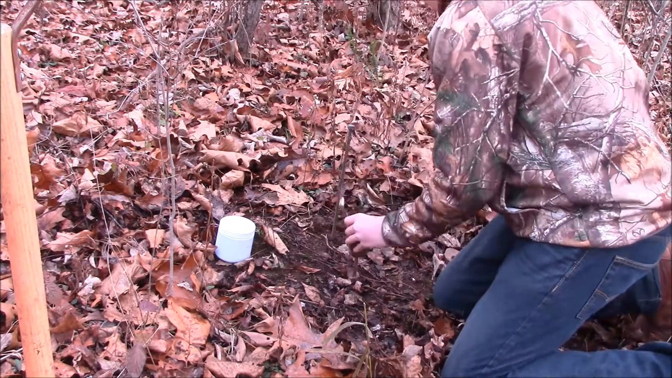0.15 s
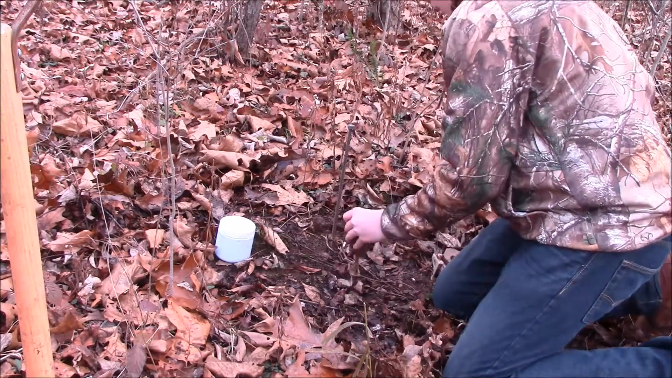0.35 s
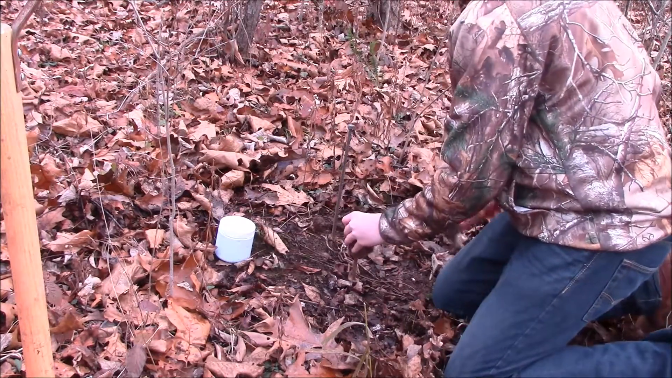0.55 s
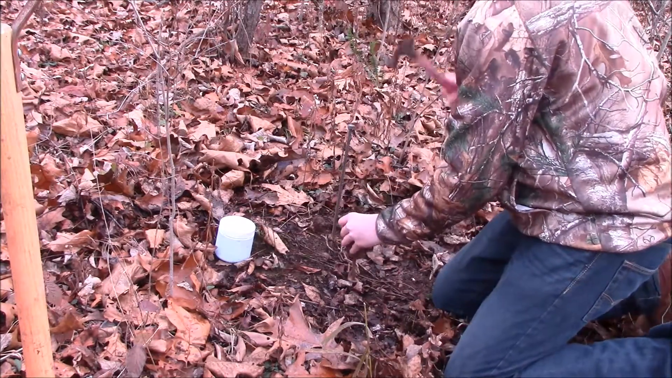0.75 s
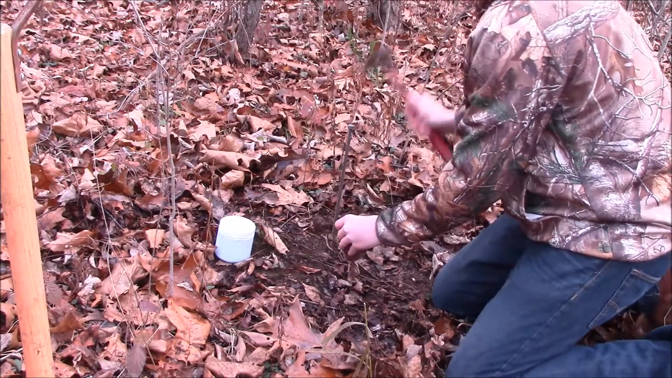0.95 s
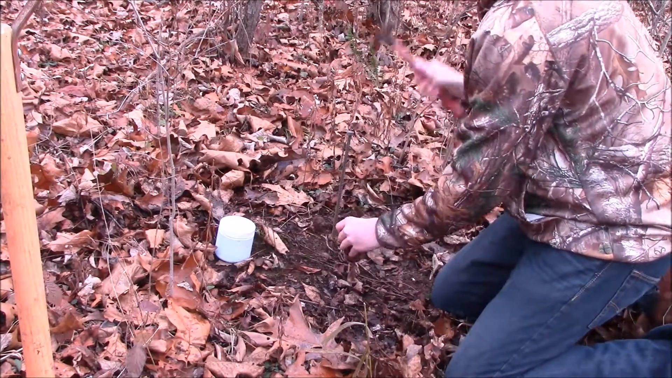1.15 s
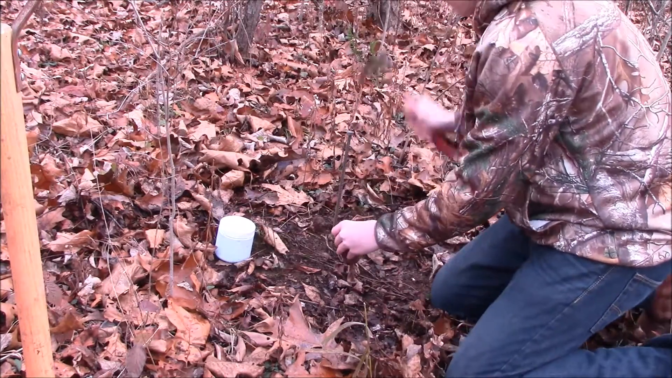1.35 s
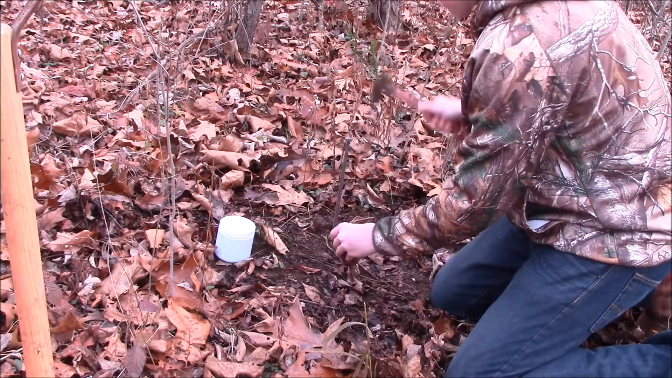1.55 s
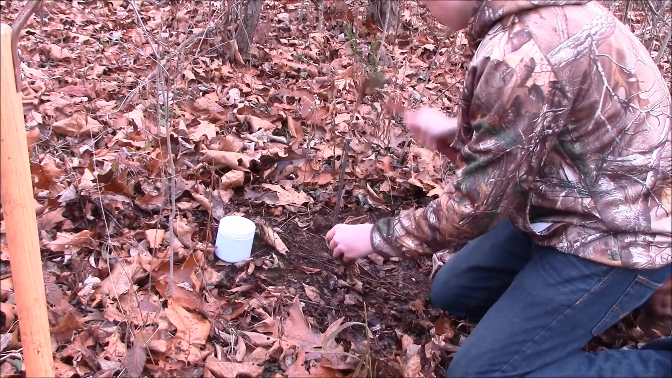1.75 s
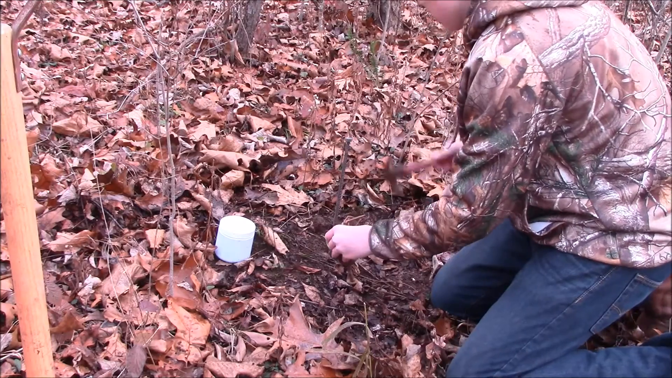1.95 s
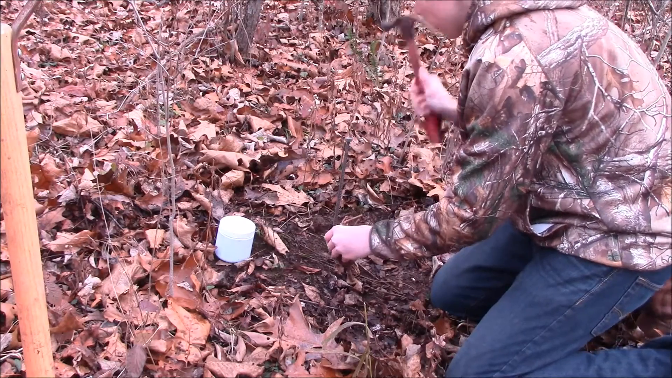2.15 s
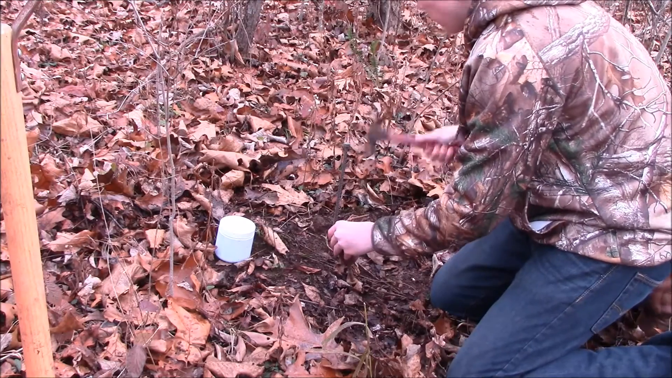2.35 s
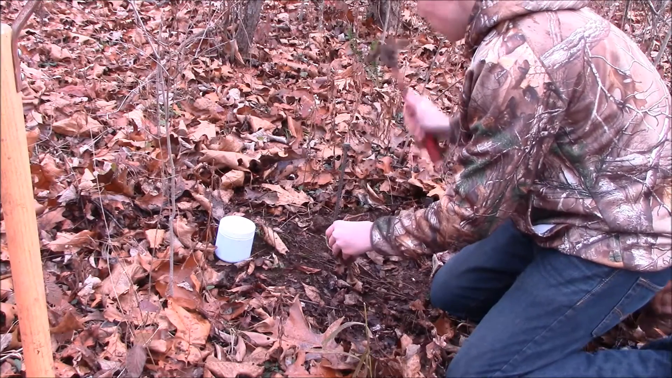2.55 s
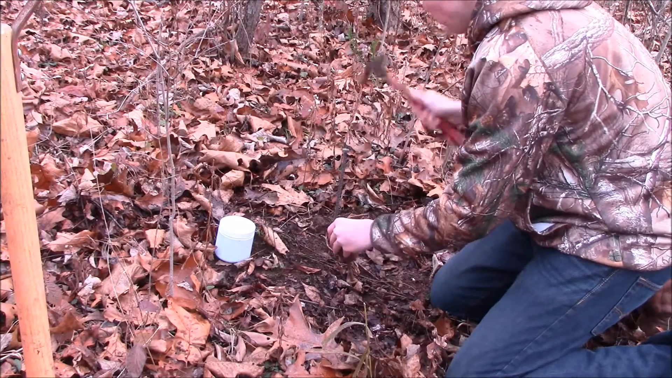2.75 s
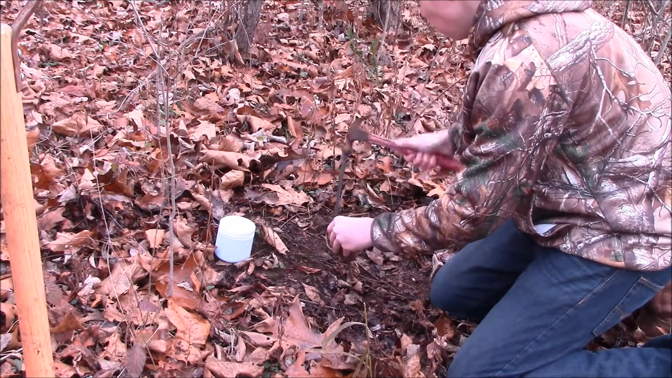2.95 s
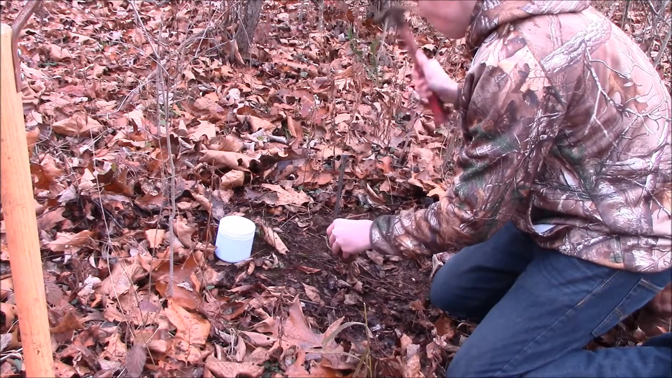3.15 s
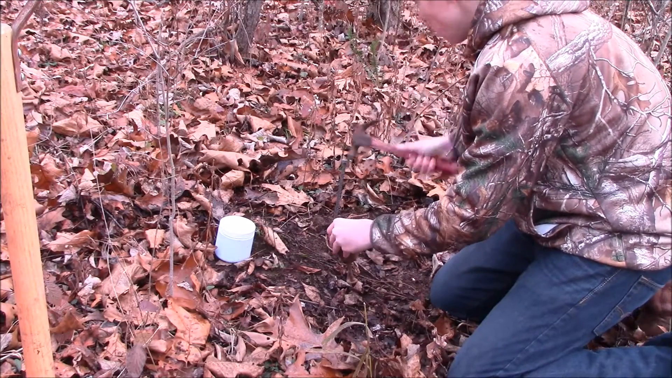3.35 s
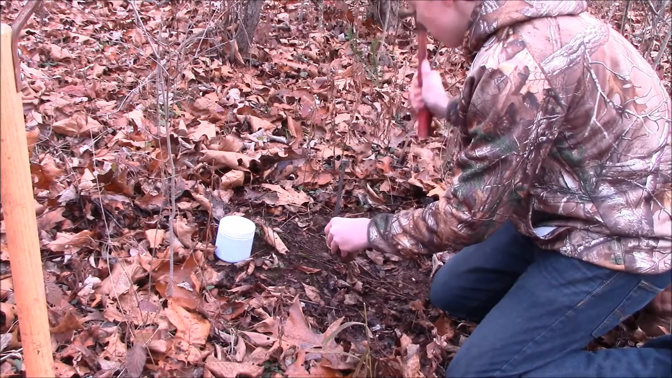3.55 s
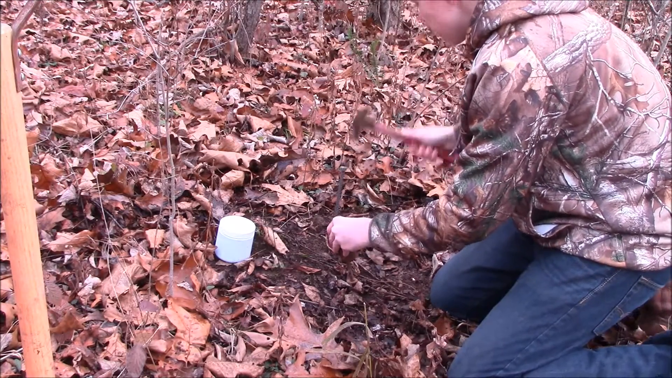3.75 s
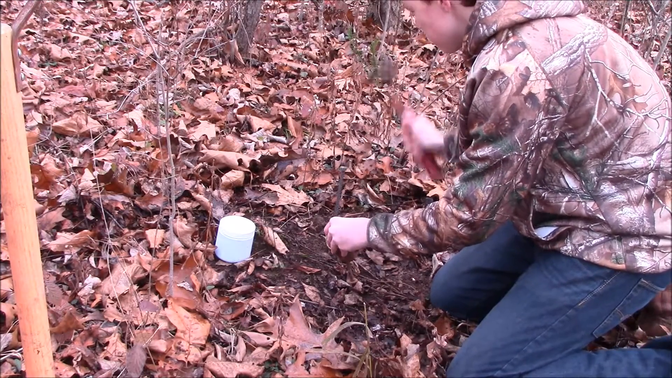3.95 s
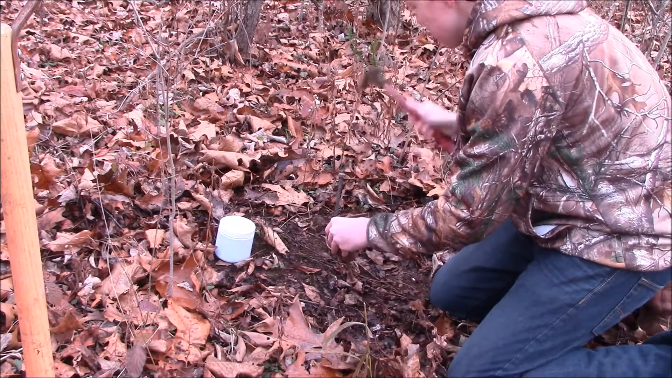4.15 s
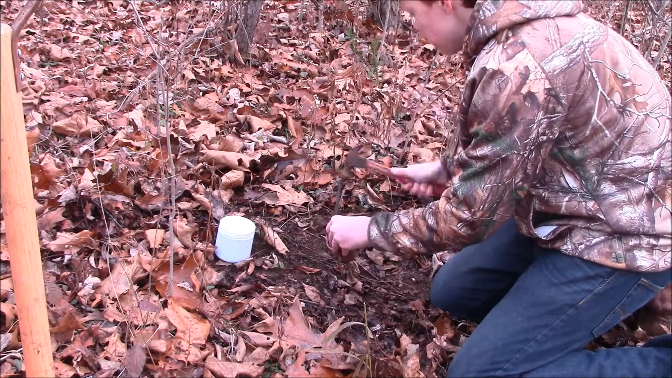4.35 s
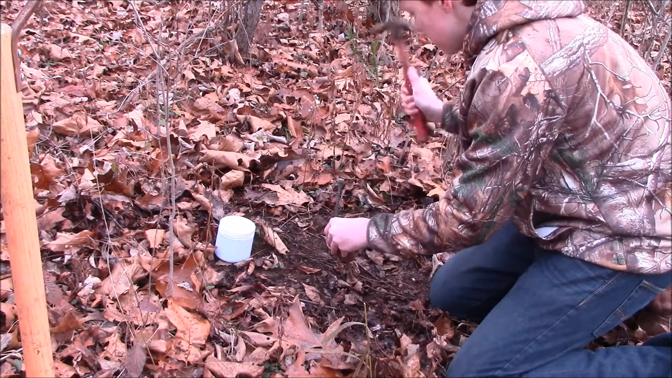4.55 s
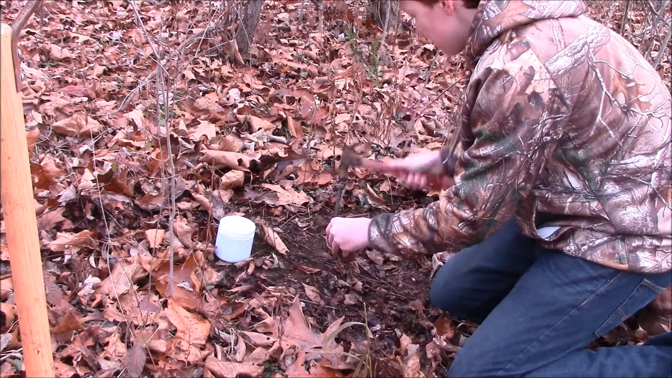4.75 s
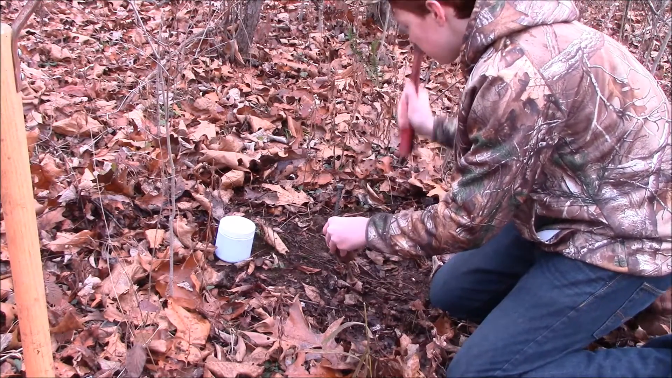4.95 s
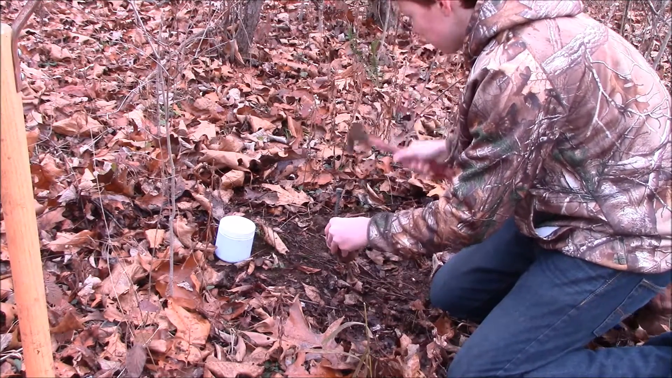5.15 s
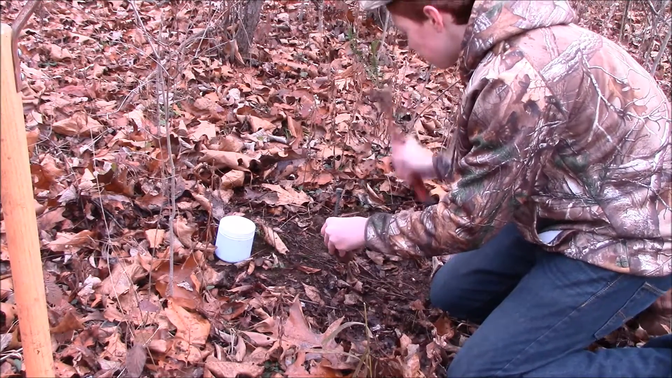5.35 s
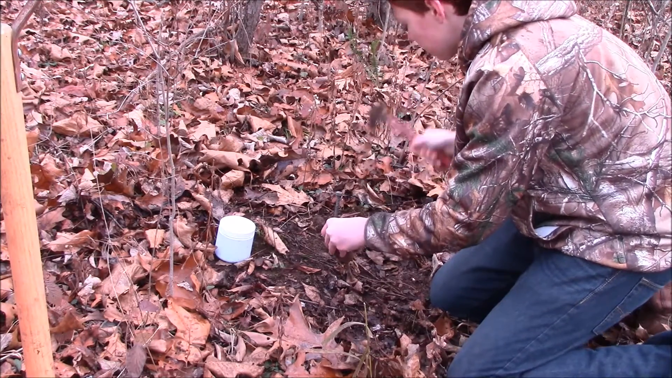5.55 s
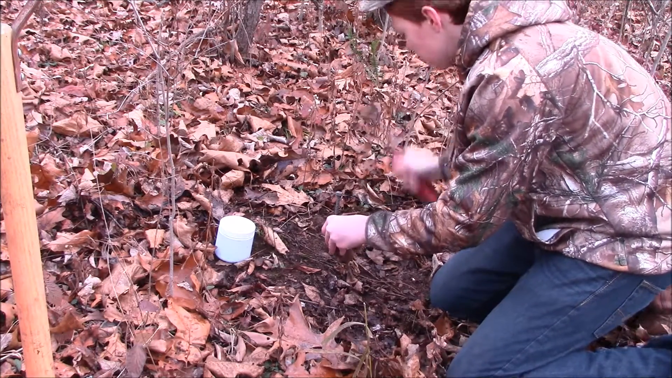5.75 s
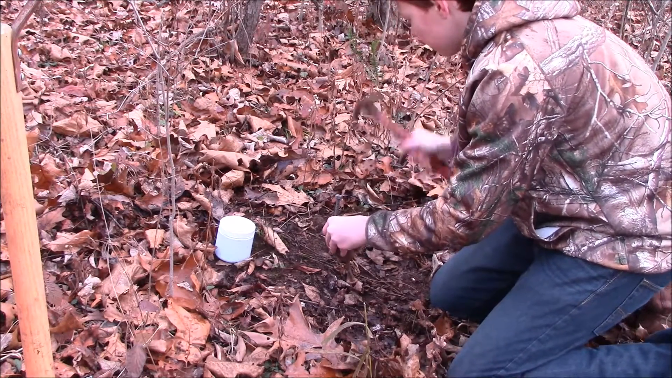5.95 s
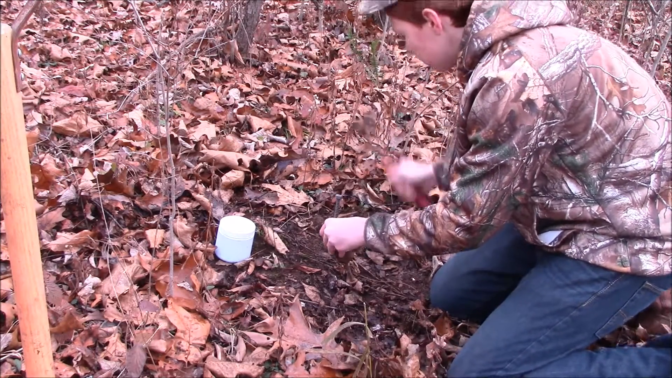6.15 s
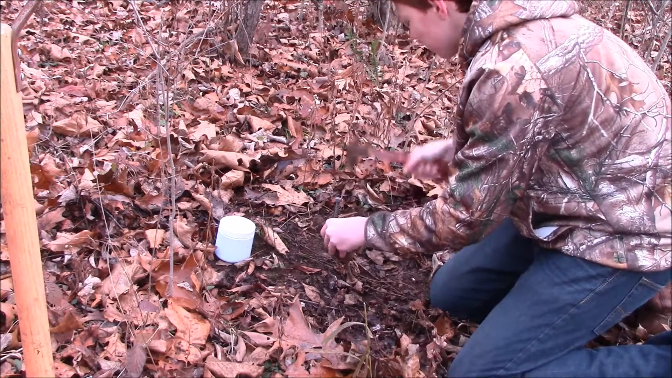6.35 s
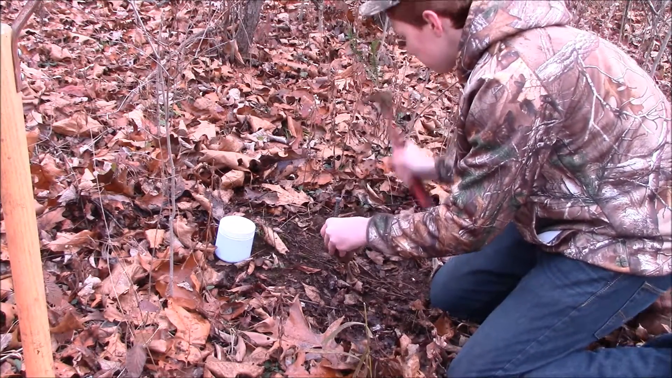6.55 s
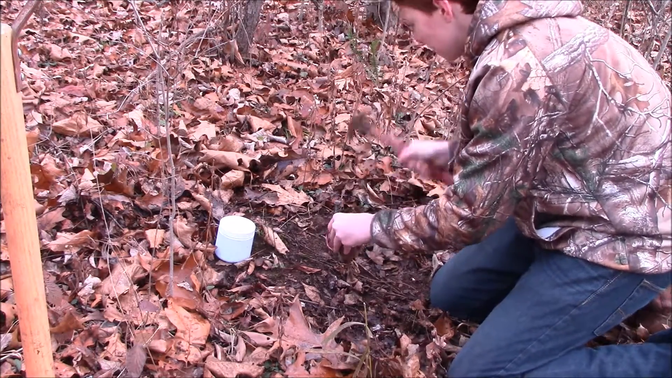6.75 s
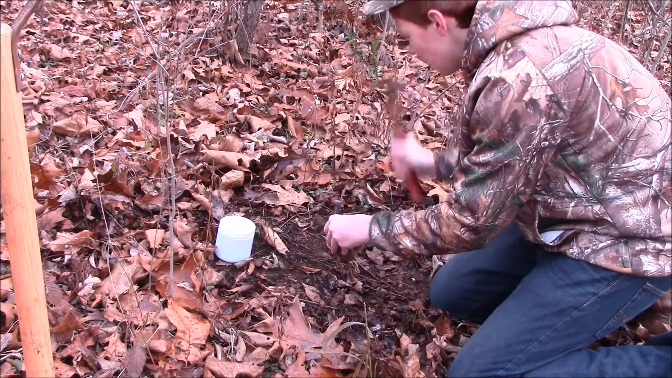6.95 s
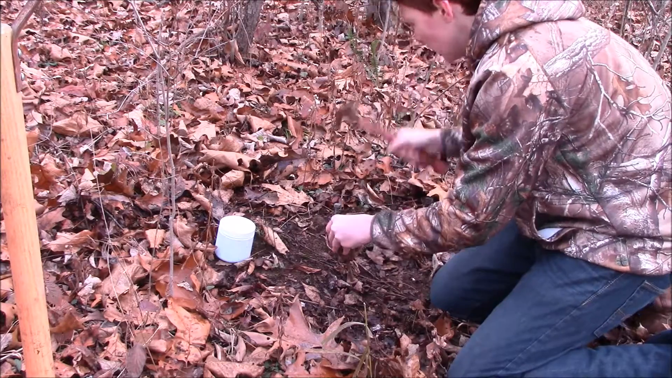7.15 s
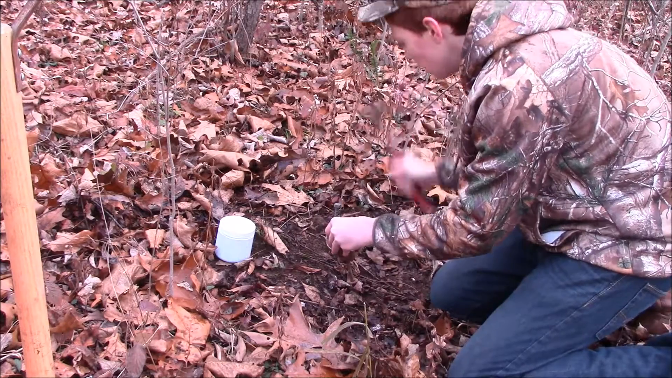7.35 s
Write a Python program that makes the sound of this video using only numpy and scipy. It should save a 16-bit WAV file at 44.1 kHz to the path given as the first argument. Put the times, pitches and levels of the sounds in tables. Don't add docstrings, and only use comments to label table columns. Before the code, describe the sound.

Sixteen hard metallic hammer blows drive a steel stake into soft ground, over distant traffic hum, with short echoes off trees and light sleeve rustle.

```python
import sys
import numpy as np
from scipy import signal
from scipy.fft import rfft, irfft
from scipy.io import wavfile

SR = 44100
rng = np.random.default_rng(int(sys.argv[2]) if len(sys.argv) > 2 else 0)


def ratio_of_db(decibels):
    return 10 ** (np.asarray(decibels, float) / 20)


def materialize(psi):
    bounded = np.clip(np.atleast_2d(psi).T, -1, 1)
    quanta = np.round(bounded * 32767).astype(np.int16)
    wavfile.write(sys.argv[1], SR, quanta)


N = 326340
T = np.arange(N) / SR

# (first contact [s], force [dB], hardness [dB], angle of the landing spot on the face [deg],
# contact duration [s])
BLOWS = [(1.0405, -19, 0, 159, 0.0046), (1.4346, -19, 3, 50, 0.0036), (2.2897, -20, -1.5, 131, 0.006),
         (2.6569, -19, 2.9, 76, .003), (3.0074, -18.5, 3.5, 162, .003), (3.3564, -19, 2, 76, 0.0033),
         (3.7048, -18.5, 4, 121, .004), (4.053, -18, 4, 103, 0.0027), (4.4007, -18.5, 1.7, 180, .003),
         (4.7424, -16, -1.65, 72, .0028), (5.0974, -18, -2.5, 175, 0.0027), (5.4540, -19.5, -5, 54, 0.004),
         (5.8470, -23, 2.5, 163, 0.0045), (6.2425, -19.5, -10, 52, .0033), (6.6608, -24, 3.8, 99, 0.0024),
         (7.0655, -23, -4.5, 75, 0.0052)]


def fade(t, t60):
    return np.exp(-np.log(1000) * t / t60)


def unit(x):
    return x / np.sqrt(np.mean(x ** 2))


def add(out, s, x):
    i = int(s * SR)
    out[i:i + len(x)] += x[:len(out) - i]


def colour(x, points):
    hz, db = np.transpose(points)
    f = np.arange(x.shape[-1] // 2 + 1) * SR / x.shape[-1]
    gain = ratio_of_db(np.interp(np.log(f + 1), np.log(hz), db))
    return irfft(rfft(x) * gain, x.shape[-1])


def band(x, hz, octaves):
    edges = np.clip(hz * 2 ** (np.array([-.5, .5]) * octaves), 20, .45 * SR)
    return signal.sosfilt(signal.butter(2, edges, "band", fs=SR, output="sos"), x)


def walk(rate):
    return unit(np.interp(T * rate, np.arange(200), rng.standard_normal(200)))


def wide(side_db, size=N):
    mid, side = rng.standard_normal((2, size))
    return mid + ratio_of_db(side_db) * side * np.array([[1], [-1]])


def tones(hz, t60, db, t):
    phase, tune = rng.standard_normal((2, len(hz), 1))
    sines = np.sin(2 * np.pi * hz * (1 + 0.0011 * tune) * t + phase)
    return np.sum(ratio_of_db(db) * fade(t, t60) * sines, axis=0)


def pings(table):
    out, t = np.zeros(N), T[:8192]
    for s, db, hz, t60, *caught in table:
        caught_s = caught[0] if caught else 1
        onset_and_catch = np.clip(np.minimum(t / 0.00051, (caught_s - t) / .004), 0, 1)
        add(out, s, ratio_of_db(db) * fade(t, t60) * np.sin(2 * np.pi * hz * t) * onset_and_catch)
    return out


def gain_db(s):
    # (time [s], gain [dB])
    gain = [(0, 2), (.8, -.3), (3.8, 0.3), (4.75, -2), (5.5, -7.5), (6.1, -9), (6.8, -12.5), (7.4, -13)]
    return np.interp(s, *np.transpose(gain))


def woods():
    # (frequency [Hz], density [dB per Hz])
    hum_spectrum = [(15, -75.5), (25, -19), (43, -25), (92, -4.5), (135, -3.5), (162, 1), (204, -1),
                    (225, -3), (257, 2.5), (524, -7), (569, -5), (1300, -17.5), (1690, -45.5), (2860, -120)]
    # (frequency [Hz], density [dB per Hz])
    air_spectrum = [(530, -25), (900, -10), (1470, -4.5), (2220, -7), (3300, -7), (4680, -12),
                    (6250, -12.5), (14200, -27), (16000, -41.5)]
    hum_db, air_db = -59.5, -64.5
    low = colour(wide(-20), hum_spectrum)
    hum = ratio_of_db(0.96 * walk(7.2)) * band(low, 110, 2.8)
    hum = hum + ratio_of_db(1.2 * walk(1.3)) * band(low, 600, 2.49)
    air = unit(colour(wide(-14.0), [(450, air_spectrum[0][1] - 30)] + air_spectrum))
    swell_s, swell_width_s, swell_db = 1.58, 0.19, 4.5
    swell = swell_db * np.exp(-((T - swell_s) / swell_width_s) ** 2)
    return ratio_of_db(gain_db(T)) * (ratio_of_db(hum_db + swell) * unit(hum) + ratio_of_db(air_db) * air)


def chain():
    # (frequency [Hz], level [dB], T60 [s])
    big_link = [(3080, -23, .14), (5110, -28.5, 0.16), (6535, -17, 0.13), (7920, 0.1, 0.095),
                (12550, -19.5, .08), (13280, -23.5, .07)]
    small_link = [(15000, -7, .15), (15200, -1, .15)]
    # (time [s], level [dB], delay until caught [s])
    big_touches = [
        (0.1922, -29, 0.053),
    ]
    small_touches = [
        (.180, -53, .045),
        (.226, -47, .047),
        (.281, -46, .012),
        (.2935, -41, .012),
        (.318, -47, 0.099),
    ]
    # (time [s], level [dB], frequency [Hz], T60 [s], delay until caught [s])
    clinks = [
        (.189, -36, 4320, 0.012, .03),
        (.207, -47, 10360, .07, .06),
        (.227, -56, 13280, .4, .044),
        (.232, -41, 8750, .011, .02),
        (.232, -40, 15200, .027, .03),
        (.293, -42.5, 14500, .05, .02),
        (.305, -35, 7150, 0.0051, .02),
        (.307, -63, 12820, .12, .03),
    ]
    rings = []
    for modes, touches in ((big_link, big_touches), (small_link, small_touches)):
        for s, db, caught in touches:
            rings += [(s, db + lift, hz, t60, caught) for hz, lift, t60 in modes]
    return pings(clinks + rings)


def rustle():
    # (time [s], level [dB], centre frequency [Hz], bandwidth [octaves])
    ticks = [(0.232, -51, 10030, 1.6), (0.2765, -60, 7700, 1.7), (0.294, -50, 8030, 1.7),
             (0.3054, -56, 8000, 0.86), (.338, -58, 8200, 0.38), (0.422, -64, 8000, 0.45),
             (0.653, -53, 3060, 2.1), (0.783, -65, 4800, 1.4), (0.9285, -57, 4800, 2.5),
             (1.75, -64, 6600, 1.5), (1.8543, -59, 5600, 1.3), (2.136, -57.5, 3670, 1.6),
             (4.2703, -58, 3440, 0.8), (4.623, -60, 3400, 0.64), (4.651, -63, 6700, 1.2),
             (4.992, -63, 8200, 2.2), (5.312, -60, 3320, 0.64), (5.336, -64, 7030, 2.1),
             (5.738, -69, 4730, 2.6), (6.1046, -70, 5010, 2.1), (6.905, -78, 8140, 2.9)]
    # (time [s], level [dB], centre frequency [Hz], bandwidth [octaves])
    clods = [
        (4.437, -47, 1500, 1.8),
        (6.699, -51, 1600, 2.4),
        (6.702, -52, 600, 1.2),
        (7.113, -55, 800, 1.6),
        (.190, -54, 2500, 2.5),
        (.296, -57, 1800, 1.5),
        (.652, -55, 1900, 1.),
    ]
    # (middle [s], duration [s], level [dB])
    swishes = [
        (0.304, 0.22, -67),
        (0.57, .07, -63),
        (0.836, .045, -68),
        (0.963, 0.071, -73),
        (1.868, 0.082, -63.5),
        (2.148, 0.038, -67.5),
        (4.64, .03, -70),
        (5.018, .035, -76),
        (5.366, .035, -73),
        (5.73, .07, -78),
    ]
    lift_share, last_beat_s = .76, .39
    lift_s, lift_db, scatter_db = 0.058, -75, 0.5
    series = np.transpose(BLOWS)[0, 2:]
    beats = np.append(np.diff(series), last_beat_s)
    lifts = []
    for s, beat in zip(series, beats):
        db = lift_db + gain_db(s) + scatter_db * rng.standard_normal()
        lifts.append((s + lift_share * beat, lift_s, db))
    arm = np.zeros(N)
    for s, length, db in swishes + lifts:
        arm += ratio_of_db(db) * np.exp(-np.abs((T - s) / (.55 * length)) ** 3)
    grain = ratio_of_db(1.5 * rng.exponential(size=N // 64 + 1)).repeat(64)[:N]
    out = np.zeros(N)
    for s, db, hz, octaves in ticks + clods:
        burst = unit(band(rng.standard_normal(900), hz, octaves))
        add(out, s, ratio_of_db(db + 5.5) * burst * fade(T[:900], 0.028))
    return out + arm * unit(band(grain * wide(-18), 8600, 1.1))


def clank(family_db, length, uneven_db, rise_s=0.00055, modes_db=-0.04):
    # (frequency [Hz], level [dB])
    families = [
        [(1550, -9), (2190, -13.5), (2520, -4), (2900, 1.5), (3300, -4.5), (3600, 1)],
        [(4490, -7), (4800, 3.5), (5270, -3.5)],
        [(6980, 2.5), (7450, 3), (7990, -2.5), (8420, -4.5)],
        [(9520, -6), (9890, 4.5), (10330, -3), (10600, 5)],
        [(11800, 0.5), (12500, 0.5), (13200, -2), (14300, -3.5), (15000, -4)],
    ]
    family_hz = [2600, 4800, 7500, 10200, 13000]
    # (frequency [Hz], density [dB per Hz])
    crack_spectrum = [(300, -30.5), (700, -8.5), (2000, -6.5), (4800, 2.5), (5900, -7.5), (7300, -1),
                      (11000, -4.5), (15000, -9), (17000, -7.5)]
    t60_s = .028
    t = T[:4096]
    modes = np.array([(hz, db + lift) for family, lift in zip(families, family_db) for hz, db in family])
    strike_db = modes[:, 1:] + uneven_db * rng.standard_normal((len(modes), 1))
    click = ratio_of_db(19) * (np.arange(len(t)) == 24)
    grate = ratio_of_db(-2.0) * rng.standard_normal(len(t)) * np.sign(uneven_db)
    crack = colour(colour(click + grate, crack_spectrum), list(zip(family_hz, family_db)))
    touch = np.exp(-(t / length) ** 2) + ratio_of_db(-10) * fade(t, 0.12)
    body = tones(modes[:, :1], t60_s, strike_db + modes_db, t)
    return (body + ratio_of_db(8.5) * crack) * touch * np.clip(t / rise_s, 0, 1)


def ring(ring_db, tone_db, choke_s):
    # (frequency [Hz], T60 [s])
    head = [(4495, .09), (4815, .09), (6985, .08), (7420, .065), (10560, .065)]
    # (frequency factor [1], level [dB])
    head_pair = [(1.003, 8), (.991, 3)]
    stake_hz, stake_rise_s = 3976, 0.0016
    t = T[:8192]
    hz, t60 = np.transpose(head)[:, :, None]
    swell = (1 - np.exp(-t / stake_rise_s)) * np.exp(-(t / choke_s) ** 2)
    pairs = sum(tones(hz * split, t60, np.array(ring_db)[:, None] + db, t) for split, db in head_pair)
    return pairs + ratio_of_db(tone_db + 9.0) * swell * np.sin(2 * np.pi * stake_hz * t)


def thump(db, upper_db):
    # (frequency [Hz], T60 [s])
    soil_modes = [(230, 0.025), (415, 0.042)]
    # (frequency [Hz], T60 [s], level against the thump [dB])
    handle = [(828, 0.018, -9), (1166, 0.015, -4.5)]
    t = T[:6000]
    hz, t60 = np.transpose(soil_modes)[:, :, None]
    hz = hz * (1 + 0.017 * rng.standard_normal((2, 1)))
    soil = tones(hz, t60, np.array([[-upper_db / 2], [upper_db / 2]]), t)
    crumble = ratio_of_db(-7.5) * unit(band(rng.standard_normal(len(t)), 210, 2.0)) * fade(t, 0.082)
    late = band((soil + crumble) * (1 - np.exp(-(t / .004) ** 2)), 300, 2.4)
    knock = tones(*np.transpose(handle)[:, :, None], t) * np.clip(t / 0.00035, 0, 1)
    return ratio_of_db(db + 4.0) * (late + knock)


def trunks(blow):
    # (centre frequency [Hz], T60 [s], level [dB])
    echo_bands = [(240, 0.59, -11), (700, .3, -28.5), (1850, 0.34, -6.5), (3930, 0.4, -5.5),
                  (7596, 0.14, -6), (13100, 0.23, -6)]
    t = T[:20000]
    echo = 0
    for hz, t60, db in echo_bands:
        decay = fade(t, t60) + ratio_of_db(-22.5) * fade(t, 3 * t60)
        echo = echo + ratio_of_db(db - 24.5) * band(wide(-15, size=len(t)), hz, 1.3) * decay
    echo *= 1 - np.exp(-(t / .012) ** 2)
    return signal.fftconvolve(blow[None], echo, axes=1)


def hammering():
    # (soil thump [dB], stake tone [dB], time until the grip chokes the tone [s],
    # tone sent towards the trunks [dB])
    answers = [(-32, -27.5, .016, -28.5), (-33.5, -32.5, 0.032, -32), (-30.5, -33.5, .04, -33),
               (-26, -25, .027, -30.5), (-21.5, -29, .024, -33.5), (-24, -30, 0.025, -31),
               (-25, -30.5, .0087, -29), (-25.5, -29.5, 0.019, -30), (-24.5, -39, 0.039, -35.5),
               (-27, -22.5, 0.0054, -31.5), (-25, -39.5, .016, -41), (-27, -36.5, .019, -32),
               (-25, -40, 0.024, -36.5), (-26, -40, 0.018, -42), (-26, -41, 0.009, -31.5),
               (-32, -40.5, 0.019, -46)]
    # (blow number, delay [s], level against the blow [dB], duration [s])
    chatter = [(0, .0062, -2, .0045), (1, .004, -6, .0015), (2, .0075, -1, .0035), (2, .0203, -9, .0035),
               (3, .0066, -7, .0025), (4, .0048, -7, .002), (4, .008, -13, .0015), (5, .005, -6, .002),
               (5, .0075, -8, .004), (6, .007, -7, .002), (6, .0105, -8, .0025), (7, .006, -8, .0025),
               (8, .0046, -9, .002), (9, .004, -7, .0035), (10, .0033, -4, .004), (14, .0036, -7, .0015),
               (15, .0145, -17, .002)]
    # (time [s], peak level [dB], frequency [Hz], T60 [s])
    rebounds = [
        (5.128, -36, 1200, 0.026),
        (5.144, -47, 1150, 0.022),
    ]
    # (level against the force [dB], share of the hardness [1])
    families = [(-0.68, 0.05), (-2.57, .2), (0.94, 0.05), (-2.55, 1), (-7.5, 1)]
    # (strongest level [dB], angle of the strongest spot [deg])
    face = [(-34, 144), (-33, 38), (-33.5, 122), (-34, 138), (-34, 104)]
    node_lines = [3, 2, 3, 3, 2]
    node_leak, ring_gain_share = .1, .12
    usual_thump_db, darker_per_db = -28, 0.8
    echo_db, echo_gain_share = -13, 0.82
    near, far = pings(rebounds), np.zeros((N, 2))
    lift_db, share = np.transpose(families)
    top_db, top_deg = np.transpose(face)
    for k, (s, force_db, hard_db, spot_deg, length) in enumerate(BLOWS):
        family_db = force_db + lift_db + share * hard_db
        thump_db, tone_db, choke_s, away_db = answers[k]
        shape = np.cos(np.radians(node_lines * (spot_deg - top_deg)))
        ring_db = top_db + ring_gain_share * gain_db(s) + 20 * np.log10(np.hypot(shape, node_leak))
        blow = ring(ring_db, tone_db, choke_s)
        soil = thump(thump_db, darker_per_db * (usual_thump_db - thump_db))
        add(blow, 0, soil)
        around = ring(ring_db + 1.0, away_db, .012)
        add(around, 0, soil)
        add(around, 0, ratio_of_db(0.5) * clank(family_db, length, uneven_db=0, modes_db=-6.5))
        add(far, s, ratio_of_db(echo_db + echo_gain_share * gain_db(s)) * trunks(around).T)
        add(blow, 0, clank(family_db, length, uneven_db=1.5))
        for number, delay, db, short in chatter:
            if number == k:
                add(blow, delay, clank(family_db + db, short, uneven_db=2.5, rise_s=.0011))
        add(near, s, blow)
    lag = ratio_of_db(-24) * np.gradient(near) * np.array([[1], [-1]])
    return near + lag + far.T


def scene():
    return woods() + chain() + rustle() + hammering()


def band_limit(x):
    return signal.sosfilt(signal.butter(12, 17070, fs=SR, output="sos"), x)


def record(dry):
    soft = np.tanh(1.7 * dry) / 1.7
    low_pass = signal.cheby2(10, 30, 16050, fs=SR, output="sos")
    return band_limit(signal.sosfilt(low_pass, soft))


dry = scene()
out = record(dry)
materialize(out)
```